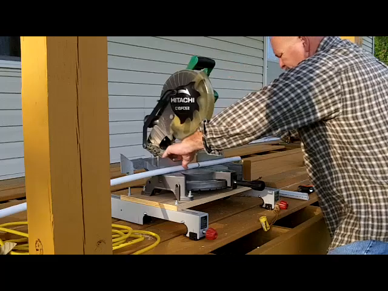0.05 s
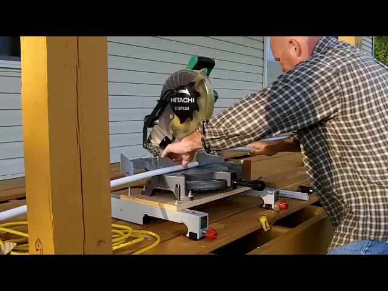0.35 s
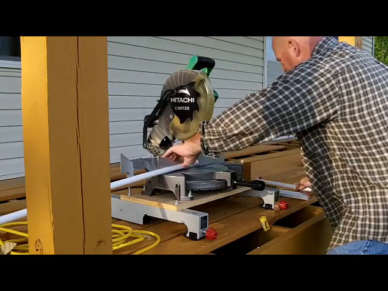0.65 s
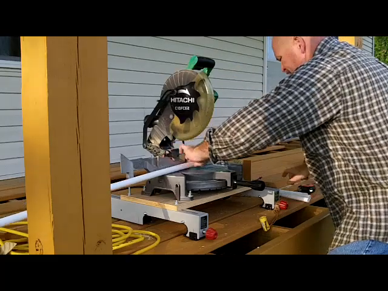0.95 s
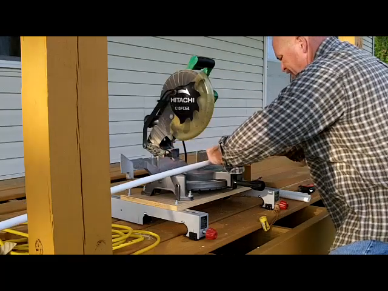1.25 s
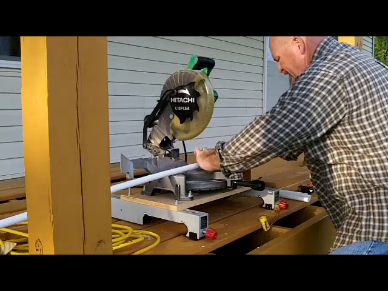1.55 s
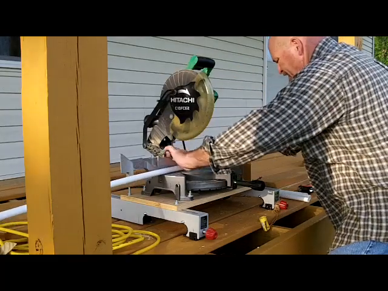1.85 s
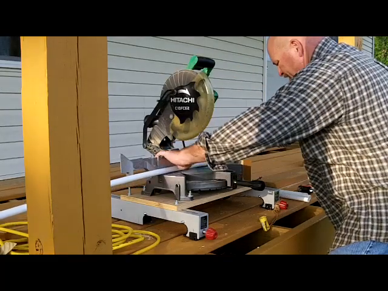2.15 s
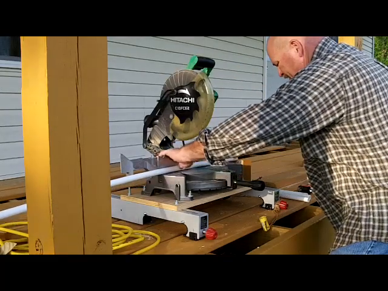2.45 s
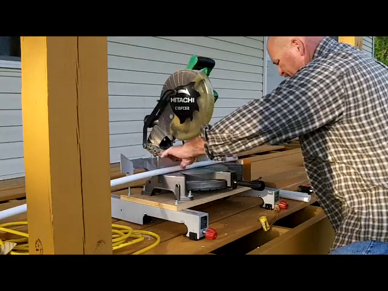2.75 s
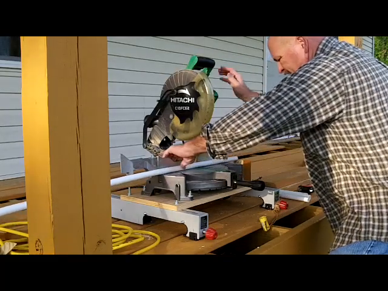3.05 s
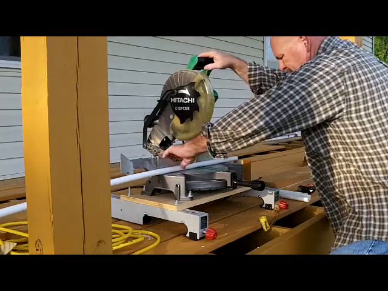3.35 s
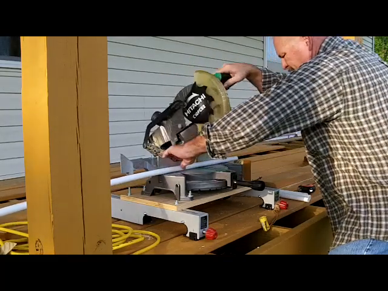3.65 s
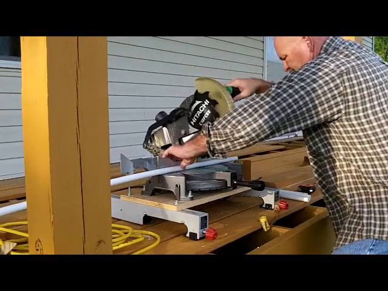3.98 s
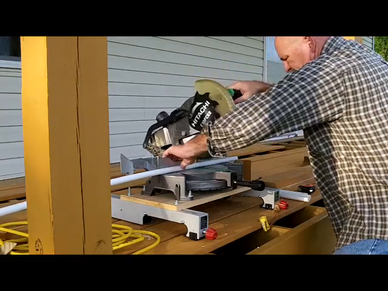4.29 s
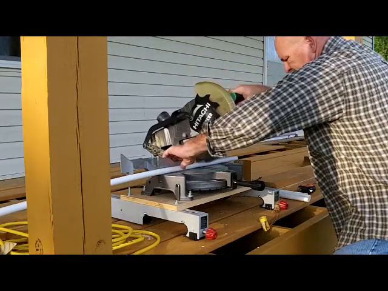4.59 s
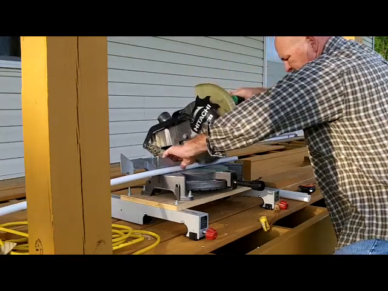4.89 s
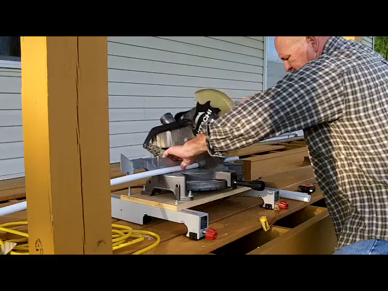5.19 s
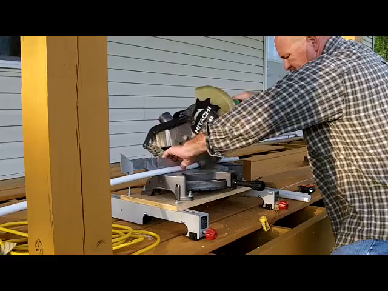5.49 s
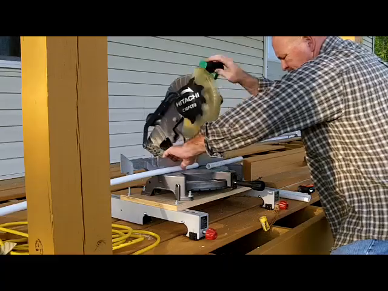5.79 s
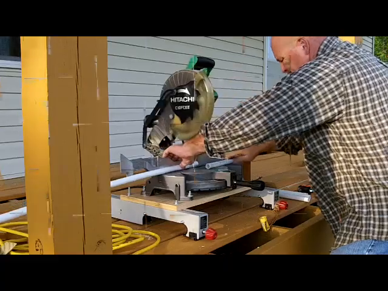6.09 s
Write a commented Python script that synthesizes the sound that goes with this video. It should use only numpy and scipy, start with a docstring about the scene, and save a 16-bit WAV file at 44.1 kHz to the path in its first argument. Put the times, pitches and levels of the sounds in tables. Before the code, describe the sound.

A miter saw coasts down outdoors, its whine and airy roar falling steadily in pitch. The blade guard ticks and squeaks faintly, then the motor kicks on with a clank and races up to a loud whine. The blade cuts a plastic pipe with a short, screeching rasp, spins freely for a moment and starts slowing again. A light breeze rumbles on the microphone.

```python
"""A mitre saw on a wooden deck in a quiet yard, heard through one microphone. It coasts to rest,
is pulled down with a few ticks of its guard, kicks into life, bites through a plastic pipe and winds
down again. Trigger, brake and friction set the rotor speed, which drives gear whine, brush buzz, tooth
rate and the air churned through the guard. Boards and house wall return short echoes, a breeze buffets
the microphone, and the recorder's gain control holds the level."""
import sys
import numpy as np
from scipy import signal
from scipy.fft import rfft, irfft
from scipy.io import wavfile

SR = 44100
rng = np.random.default_rng(int(sys.argv[2]) if len(sys.argv) > 2 else 0)


def store_pcm(level_fs):
    """Save levels as 16-bit WAV."""
    pcm = np.round(np.clip(level_fs, -1, 1) * 32767).astype(np.int16)
    wavfile.write(sys.argv[1], SR, np.atleast_2d(pcm).T)


N = 274743
T = np.arange(N) / SR
FREQS = np.fft.rfftfreq(N, 1 / SR) + 1e-3
KICK_S = 4.0315  # the trigger is pressed for the cut

# the trigger; the saw is already winding down at 0 s: (pressed [s], released [s], brake time constant [s])
TRIGGER_RUNS = [(-3.0, -0.365, .748), (KICK_S, 5.68, .69)]
# hollow roar of the guard, relative to the airflow: (time [s], level [dB])
ROAR_LEVELS = [(0, -7.5), (.6, -5.5), (1.0, 2.5), (1.55, -1), (2.2, 1), (3.3, 0), (4.1, 4.5), (4.38, -2),
               (4.55, -7.5), (5.3, -12.5), (5.6, -5), (5.8, -11), (6.23, -6)]
# tones of gearbox and fan: (multiple of rotor speed, driven level [dB], braked level [dB])
GEAR_TONES = [(1, -6, -6), (8, 2, 4), (14.2, 3, -0.5), (15.85, -9, -7), (23.8, -20, -11), (31.7, -20, -8),
              (35.3, -20, -10)]
# harmonics of the brush buzz: (multiple of bar rate, level [dB])
BRUSH_PARTIALS = [(1, 2.5), (2, -5), (3, -4.5), (4, -2), (6, -2), (10, -3), (20, -8)]
# the blade passes the near and far wall of the pipe: (time [s], half length [s], extra thrum [dB])
PIPE_WALLS = [(4.794, 0.035, 13), (5.191, 0.069, 17)]
# the teeth snag and fling a burst of chips: (time [s], level [dB], half length [s])
TOOTH_SNAGS = [(4.73, -24, 0.01), (4.861, -16, .005), (5.173, -14.5, 0.013), (5.542, -17.5, 0.018)]
# the blade rubs in the kerf and sings: (time [s], half length [s], pitch [Hz], level [dB])
KERF_TONES = [(4.97, .055, 4340, -25), (5.15, .05, 5180, -27)]
# ticks of guard and hinge: (time [s], level [dB], body relative to tick [dB], decay [s])
GUARD_TICKS = [(1.442, -18, -27, 0.021), (3.584, -32.5, 7, 0.012), (3.605, -34, -1, 0.0092),
               (3.731, -31, -6, 0.003), (3.845, -26, -27, 0.009), (3.874, -26, -24, 0.009),
               (3.903, -28, -29, 0.013), (3.941, -26.5, -27, 0.011), (3.991, -26, -20, 0.018),
               (5.09, -18, -20, .006), (5.956, -28.5, 13, 0.012), (5.975, -33.5, 8.5, 0.07)]
# squeak of the guard pivot: (time [s], pitch [Hz], level [dB])
PIVOT_SQUEAK = [(3.75, 3280, -68), (3.79, 3330, -40.5), (3.82, 3300, -49), (3.86, 2420, -45),
                (3.93, 2410, -42), (3.98, 2040, -35), (4.01, 1950, -77)]
# steady breeze on the microphone: (time [s], level [dB])
BREEZE_LEVELS = [(0, -24), (1.0, -26), (1.6, -36), (2.3, -38.5), (2.55, -27.5), (2.95, -34.5), (3.6, -31),
                 (3.85, -36.5), (4.4, -32.5), (5.3, -41.5), (6.23, -34.5)]
# gusts on the microphone: (time [s], level [dB], half length [s])
MIC_GUSTS = [(0.094, -17.5, 0.039), (0.326, -12, 0.0096), (0.381, -25, 0.017), (0.828, -28, 0.038),
             (1.23, -29, 0.022), (2.147, -36, 0.024), (2.442, -23.5, 0.027), (2.643, -31, 0.014),
             (3.263, -21.5, 0.016), (3.62, -32.5, 0.071), (5.845, -31, 0.034)]
# sharp buffets of air on the microphone: (time [s], peak [dB], half width [s])
MIC_BUFFETS = [(3.3836, -14, 0.00063), (3.387, -8.5, .0014), (3.3984, -4, 0.00054)]

# resonances of the saw: (frequency [Hz], width [Hz], level [dB])
GUARD_MODES = [(435, 42, 8), (590, 48, 7), (720, 55, 7), (835, 50, 7), (885, 50, 6), (955, 45, 6),
               (1065, 45, 3), (1212, 34, 7), (1305, 90, 3), (1625, 30, 2), (1733, 65, 3), (2025, 65, 0),
               (2660, 65, -1), (3070, 110, -1)]  # cavities of guard and housing
BLADE_MODES = [(2176, 28, -1), (2395, 110, 5), (2810, 110, 1), (3480, 150, 0), (4253, 34, 3), (5140, 80, 2),
               (5201, 22, 4), (5727, 40, 3), (6030, 120, -3), (6427, 36, -1)]
GEAR_CASE_MODES = [(2440, 330, 6.5), (2740, 170, 3.5), (3110, 150, 3)]
MOTOR_MODES = [(2350, 260, 5), (2850, 160, 5), (3480, 130, 2)]

# broad spectrum of each sound: (frequency [Hz], relative level [dB])
AIR_ROAR = [(60, -16), (130, -10), (230, -9), (400, -2.5), (800, 0.5), (1100, 0.5), (1500, 0.5),
            (2200, 0.5), (5000, -69.5)]
AIR_RUSH = [(500, -36), (1100, -38), (1500, -6.5), (2000, 0.5), (2500, 4), (3100, 4.5), (3900, -0.5),
            (5000, -18), (8000, -67)]
AIR_HISS = [(1500, -17.5), (3200, -1), (4300, 2), (5500, -0.5), (6500, -6), (7500, -11.5), (9000, -12),
            (10200, -16.5), (11200, -68), (15000, -66)]
AIR_WASH = [(60, -23), (170, -7.5), (300, 3.5), (420, -2.5), (700, -19), (3000, -60)]  # low air thrown off the blade
BLADE_RING = [(1500, -36), (2100, -7.5), (2400, -0.5), (2850, -0.5), (3500, 1), (4250, -12), (5150, -10.5),
              (5750, -5.5), (6500, -15), (9000, -49)]
GEAR_WHINE = [(150, -22), (330, -1), (450, -1), (700, -3.5), (1000, 0), (1500, -2), (1900, 0.5), (2400, 3),
              (3150, 6), (3550, -5), (5500, -29), (7000, -36), (12000, -47)]
BRUSH_BUZZ = [(300, -17), (900, -12), (1400, -8), (2000, 0), (2600, 1), (3700, -5.5), (5000, -6.5),
              (6500, -14.5), (9000, -16.5), (10500, -22), (12500, -54)]
TOOTH_SCREECH = [(3000, 0), (4800, 3.5), (5400, 5), (6300, 6), (7000, 1), (8300, -5), (10000, 0),
                 (11500, -19), (15000, -15)]
CHIP_SPRAY = [(300, -25), (1200, -19), (1700, -19), (3200, 8), (5200, 12.5), (6400, 4), (8000, -4),
              (10200, -3.5), (11300, -33), (13000, -18), (15000, -26)]
GEAR_SLAM = [(60, -16), (250, -18), (550, -1), (1300, 6.5), (2200, 4), (3500, 5.5), (5000, -2.5),
             (9000, -18), (15000, -38)]
GUARD_CLANK = [(250, -28), (480, -5), (620, 0), (850, 1), (1100, -4), (2000, -27), (5000, -48)]
SURGE_GROWL = [(60, -34), (120, 5), (250, -5), (450, -1), (620, 2), (830, 5), (1100, -10), (2000, -8),
               (4000, -6), (10000, -45)]
TICK_CONTACT = [(300, -10), (1200, -7), (2400, 8.5), (4200, 2), (6000, -13), (10000, -15), (15000, -47)]
WIND_RUMBLE = [(10, -4), (25, 3), (50, -4), (100, -11), (180, -20), (300, -28.5), (800, -38.5), (3000, -72)]
YARD_AMBIENCE = [(40, 16), (200, -13), (600, 7.5), (1500, -45), (3000, -5), (6000, -11.5), (10000, -12.5),
                 (15000, -20.5)]

FREE_HZ, GEAR_RATIO = 413.2, 43 / 8  # free rotor speed; rotor turns per blade turn
TEETH, BARS = 24, 28  # on the blade; on the commutator
TOP_HZ = 15300  # upper limit of the recorder


def rotor():
    """Rotor speed [Hz]: it races up on the trigger; then the brake slows it and friction ends the run."""
    run_up_s, run_up_shape = .3406, .85
    release_hz, drag_hz = 402, 1375  # at drag_hz, air drag would equal the brake
    friction_hz_per_s, stop_s, handover = 14.9, 4.152, 6.2
    drag = release_hz / drag_hz
    hz = np.zeros(N)
    for pressed, released, brake_s in TRIGGER_RUNS:
        held, loose = np.maximum(T - pressed, 0), np.maximum(T - released, 0)
        driven = FREE_HZ * (1 - np.exp(-(held / run_up_s) ** run_up_shape))
        braked = release_hz / ((1 + drag) * np.exp(loose / brake_s) - drag)
        coasting = friction_hz_per_s * np.maximum(stop_s - loose, 0)
        slowing = (braked ** handover + coasting ** handover) ** (1 / handover)  # smooth maximum
        hz = np.where(T >= pressed, np.minimum(driven, slowing), hz)
    return np.maximum(hz, 1)


def air(rotor_hz):
    """Turbulence round the blade rings guard and steel, throbbing with each turn of blade and rotor."""
    throb = pulses(turns(rotor_hz / GEAR_RATIO), sharp=.023) * pulses(turns(rotor_hz), sharp=.064)
    roar = colour(noise() * throb * undb(1.7 * walk(15.4)), AIR_ROAR, GUARD_MODES)
    roar *= undb(curves(ROAR_LEVELS)[0])
    eddies = noise() * throb * undb(1.6 * walk(10.7))
    rush = undb(-2) * colour(eddies, AIR_RUSH, GUARD_MODES + BLADE_MODES, ring_db=-2.5)
    hiss = undb(-5) * colour(noise() * throb, AIR_HISS, BLADE_MODES, ring_db=-1.5)
    hiss *= saturate(rotor_hz, knee=12.7, power=1.2)
    wash = undb(-19.5) * colour(noise() * throb, AIR_WASH) * (rotor_hz / FREE_HZ) ** .88
    return roar + rush + hiss + wash


def blade_ring(rotor_hz):
    """The coasting blade rings at its own steady pitches, shaken once a turn."""
    shake = noise() * pulses(turns(rotor_hz / GEAR_RATIO), sharp=.13) * undb(3.7 * walk(9))
    shaken = saturate(rotor_hz, knee=17, power=2.8)  # too gentle to ring near rest
    drowned = saturate(rotor_hz, knee=245, power=2.8)  # lost in the faster air
    return undb(-6.5) * shaken * (1 - drowned) * colour(shake, BLADE_RING, BLADE_MODES, ring_db=19)


def gear_load(rotor_hz):
    """How hard the gears sing: driven once they run fast, and louder as the brake takes hold."""
    idle_load, grip_s = .33, .055  # load kept up by the fan; time for the brake to load the teeth
    acceleration = np.gradient(rotor_hz) * SR
    strain = saturate(acceleration, knee=58, power=1.5)
    driving = np.maximum(strain, idle_load) * (acceleration > 0) * saturate(rotor_hz, knee=190, power=14)
    braking = strain * lag(lag(1. * (acceleration < 0), grip_s), grip_s)
    return undb(-12) * driving, undb(-9) * braking


def gears(rotor_hz):
    """Shaft, meshing teeth and fan whine: rough tones that swell as they glide through resonances."""
    angle = turns(rotor_hz * (1 + .005 * walk(30)))
    fast = np.clip(rotor_hz / 300, 0, 1)
    core = 1 - .42 * fast  # with speed, the pure core gives way to a noisy skirt
    driving, braking = gear_load(rotor_hz)
    whine = 0
    for order, driven_db, braked_db in GEAR_TONES:
        skirt = .33 * (walk(40) + 1j * walk(40)) + .55 * fast ** 2 * (walk(150) + 1j * walk(150))
        tone = np.real((core + skirt) * np.exp(1j * order * angle))
        load = undb(driven_db) * driving + undb(braked_db) * braking
        whine += load * undb(1.8 * walk(19)) * tone
    wobble = pulses(angle / GEAR_RATIO, sharp=.35)  # once per blade turn
    return colour(whine * wobble, GEAR_WHINE, GUARD_MODES + GEAR_CASE_MODES, ring_db=-1)


def brushes(rotor_hz):
    """Carbon brushes rasp over uneven commutator bars; falling harmonics light each resonance in turn."""
    angle = turns(rotor_hz * (1 + .0055 * walk(60)))
    buzz = 0
    for k in range(1, 21):
        in_band = k * BARS * rotor_hz < TOP_HZ
        level = response(BRUSH_PARTIALS, k) * undb(2 * walk(8.9))
        buzz += in_band * level * np.cos(k * BARS * angle + rng.uniform(0, 2 * np.pi))
    uneven = pulses(4 * angle, sharp=.35) * pulses(angle, sharp=.35)  # four groups of bars
    rasp = colour(buzz * uneven, BRUSH_BUZZ, GUARD_MODES + BLADE_MODES + MOTOR_MODES, ring_db=2.5)
    drowned = saturate(rotor_hz, knee=128, power=6.7)  # lost in the faster air
    return undb(-12) * (1 - drowned) * rasp


def slot_drone(rotor_hz, slots=5):
    """The blade's slots chop the air: a rough low tone and its octave, heard only near full speed."""
    angle = turns(slots * rotor_hz / GEAR_RATIO * (1 + .013 * walk(41)))
    tone = undb(2 * walk(11)) * np.cos(angle)
    octave = undb(-3 + 5.7 * walk(14)) * np.cos(2 * angle)
    return undb(-17) * (rotor_hz / FREE_HZ) ** 16 * (tone + octave)


def pipe_thrum(tooth_angle):
    """The pipe thrums at the tooth rate and its octave, most as the blade enters and leaves."""
    level_db = -7 + sum(db * swell(T, s, half) for s, half, db in PIPE_WALLS)
    tone = np.cos(tooth_angle) + undb(-8) * np.cos(2 * tooth_angle)
    return undb(level_db + 2 * walk(23)) * (.85 + .4 * walk(110)) * tone


def screech(tooth_angle, bite):
    """Chattering, unevenly timed teeth break the upper harmonics into a screech."""
    strike = tooth_angle + .055 * each_tooth(tooth_angle)
    chatter = sum((1 + .5 * walk(200)) * undb(3.8 * walk(22)) * np.cos(k * strike) for k in range(2, 10))
    return colour(bite * chatter, TOOTH_SCREECH, BLADE_MODES)


def chips(tooth_angle, bite):
    """Each tooth throws a puff of gritty chips."""
    grit = unit(noise() * undb(4.5 * walk(1300) + 1.2 * walk(70)))
    return colour(grit * bite * pulses(tooth_angle, sharp=.57), CHIP_SPRAY, BLADE_MODES, ring_db=3)


def cut(rotor_hz):
    """The teeth strike the plastic pipe: thrum, screech and chips, with snags and rubs in the kerf."""
    in_s, out_s, edge_s = 4.715, 5.2, .0047
    contact = (1 + np.tanh((T - in_s) / edge_s / 2)) * (1 + np.tanh((out_s - T) / edge_s / 2)) / 4
    blade_hz = rotor_hz / GEAR_RATIO
    tooth_angle = turns(TEETH * blade_hz * (1 + .003 * walk(90)))
    thrum = pipe_thrum(tooth_angle)
    bite = unit(undb(2.5 * each_tooth(tooth_angle)))  # no two teeth are alike
    sing = screech(tooth_angle, bite)
    spray = chips(tooth_angle, bite)
    rasp = undb(-12.5) * sing + undb(-1.7) * spray
    # the rasp is brightest in the middle of the pipe
    off_centre = np.abs(2 * (T - in_s) / (out_s - in_s) - 1)
    treble = signal.sosfilt(signal.butter(2, [7000, 11000], "band", fs=SR, output="sos"), rasp)
    rasp += undb(-2) * swell(off_centre, 0, .55) * treble
    sawing = undb(-18) * contact * (thrum + rasp) * pulses(turns(blade_hz), sharp=.069)
    snags = spray * sum(undb(db) * swell(T, s, half) for s, db, half in TOOTH_SNAGS)
    rubs = sum(undb(db) * swell(T, s, half) * np.cos(turns(hz * (1 + .005 * walk(80))))
               for s, half, hz, db in KERF_TONES)
    return sawing + snags + rubs


def kick():
    """At switch-on the gears slam through their backlash and the guard clanks."""
    slam = colour(noise() * burst(KICK_S, decay=.0063), GEAR_SLAM, GUARD_MODES)
    clank = colour(noise() * burst(KICK_S, decay=.085), GUARD_CLANK, GUARD_MODES, ring_db=11)
    return slam + undb(-14) * clank


def surge(mains_hz=60, fall_db_per_s=42.5):
    """The starting current jolts the housing twice each mains cycle, and sparks crackle in step."""
    angle = 2 * np.pi * 2 * mains_hz * (T - KICK_S)
    jolts = unit(np.maximum(-np.diff(angle % (2 * np.pi), prepend=0), 0))  # a click at each wrap
    sparks = noise() * pulses(angle, sharp=1.1)
    current = (T >= KICK_S) * undb(-13 - fall_db_per_s * np.abs(T - KICK_S))
    return current * colour(.7 * jolts + .55 * sparks, SURGE_GROWL, GUARD_MODES, ring_db=-.5)


def ticks():
    """Guard and hinge tick, each tick a sharp contact and a short rattle over a hollow body."""
    contact = sum(undb(db) * (burst(s, decay) + .77 * burst(s, .00027)) for s, db, _, decay in GUARD_TICKS)
    body = sum(undb(db + body_db) * burst(s, decay) for s, db, body_db, decay in GUARD_TICKS)
    rattle = colour(noise() * contact, TICK_CONTACT, BLADE_MODES)
    return rattle + colour(noise() * body, AIR_ROAR, GUARD_MODES)


def squeak():
    """The guard pivot rubs with a faint, falling squeak."""
    hz, db = curves(PIVOT_SQUEAK)
    return np.cos(turns(hz * (1 + .027 * walk(182)))) * undb(db + 3.1 * walk(40))


def hinge():
    """The hinge rubs softly as the head swings down, ringing guard and blade."""
    low = colour(noise(), AIR_ROAR, GUARD_MODES)
    middle = undb(2) * colour(noise(), AIR_RUSH, GUARD_MODES + BLADE_MODES, ring_db=-7)
    high = undb(-7.5) * colour(noise(), AIR_HISS, BLADE_MODES)
    return (low + middle + high) * undb(-46.5 + 2 * walk(11)) * swell(T, centre=3.7, half=.5)


def deck(x, gap_s=.003, decay_s=.03):
    """Nearby boards and house wall add a short scatter of echoes behind the direct sound."""
    t = T[:SR // 4]
    echoes = rng.standard_normal(len(t)) * np.exp(-t / decay_s) * (t > gap_s)
    return x + undb(-10) * signal.fftconvolve(x, echoes / np.linalg.norm(echoes))[:N]


def breeze():
    """Gusty rumble right on the microphone, with a few sharp pressure pulses."""
    gusts = sum(undb(db) * swell(T, s, half) for s, db, half in MIC_GUSTS)
    strength = undb(curves(BREEZE_LEVELS)[0]) + gusts
    rumble = strength * unit(colour(noise() * undb(3.1 * walk(6.8)), WIND_RUMBLE))
    for s, db, width in MIC_BUFFETS:
        offset_squared = ((T - s) / width) ** 2
        rumble += undb(db) * (1 - offset_squared) * np.exp(-offset_squared / 2)
    return rumble


def yard():
    """The faint, steady background of the yard."""
    return undb(-44) * colour(noise(), YARD_AMBIENCE)


def gain_control(x, hold_db=-18.5, listen_s=.033, sense_top_db=-1.5):
    """The recorder turns the sound down once its recent level nears the level that it holds."""
    recent_power = lag(np.minimum(x[0] ** 2, undb(sense_top_db) ** 2), listen_s)
    return x / np.sqrt(np.hypot(1, recent_power / undb(hold_db) ** 2))


def undb(db):
    """Decibels to gain."""
    return 10 ** (np.asarray(db) / 20)


def unit(x):
    """Scale to rms 1."""
    return x / np.sqrt(np.mean(x ** 2))


def noise():
    """White noise."""
    return rng.standard_normal(N)


def walk(rate):
    """Smooth chance with spread 1, changing about rate times a second."""
    return unit(irfft(rfft(noise()) / (1 + (FREQS / rate) ** 4), N))


def each_tooth(angle):
    """A chance value for every tooth, coming round again with each turn of the blade."""
    return np.interp(angle / (2 * np.pi), np.arange(TEETH), unit(rng.standard_normal(TEETH)), period=TEETH)


def turns(hz):
    """Running angle of something that spins at hz."""
    return 2 * np.pi * np.cumsum(hz) / SR


def pulses(angle, sharp):
    """One smooth pulse per turn, rms 1."""
    return unit(np.exp(sharp * np.cos(angle)))


def curves(rows):
    """Each column of a table, joined by straight lines in time."""
    s, *columns = np.transpose(rows)
    return [np.interp(T, s, c) for c in columns]


def burst(s, decay):
    """An envelope that jumps up at s and dies away."""
    return (T >= s) * np.exp(-np.abs(T - s) / decay)


def swell(x, centre, half):
    """A bell-shaped rise and fall."""
    return np.exp(-((x - centre) / half) ** 2)


def saturate(x, knee, power):
    """Rises from 0 as a power of |x| and levels off at 1 above the knee."""
    grown = (np.abs(x) / knee) ** power
    return grown / (1 + grown)


def lag(x, seconds):
    """Follows x smoothly, with the given time constant."""
    keep = np.exp(-1 / (seconds * SR))
    return signal.lfilter([1 - keep], [1, -keep], x, zi=[x[:SR // 10].mean()])[0]


def response(points, hz):
    """Gain of a spectrum at the given frequencies."""
    f, db = np.transpose(points)
    return undb(np.interp(np.log(hz), np.log(f), db))


def colour(x, points, modes=(), ring_db=0):
    """Causal filter: a broad spectrum with resonances standing on it; white noise keeps its level."""
    peaks = 1 + sum(undb(db + ring_db) ** 2 / (1 + (2 * (FREQS - hz) / width) ** 2) ** 2
                    for hz, width, db in modes)
    cepstrum = irfft(np.log(unit(response(points, FREQS) * np.sqrt(peaks))), N)
    cepstrum[1:N // 2] *= 2  # fold to minimum phase
    cepstrum[N // 2 + 1:] = 0
    return irfft(rfft(x) * np.exp(rfft(cepstrum)), N)


def scene():
    """What reaches the microphone: the saw on its deck, the breeze and the yard behind, in mono."""
    rotor_hz = rotor()
    airflow = undb(-15.5) * saturate(rotor_hz, knee=51.3, power=1.5)
    whine = airflow * (gears(rotor_hz) + brushes(rotor_hz) + slot_drone(rotor_hz))
    whoosh = airflow * (air(rotor_hz) + blade_ring(rotor_hz))
    saw = whoosh + kick() + surge() + hinge() + deck(whine + cut(rotor_hz) + ticks() + squeak())
    return (saw + breeze() + yard())[None]


def record(dry):
    """The treble has a narrow dip near 8 kHz; the recorder rides the gain, clips and loses the top."""
    dipped = signal.lfilter(*signal.iirnotch(7850, 5.5, fs=SR), dry)
    clipped = np.clip(gain_control(dipped), -1, 1)
    return signal.sosfilt(signal.ellip(8, .2, 70, TOP_HZ, fs=SR, output="sos"), clipped)


dry = scene()
out = record(dry)
store_pcm(out)
```